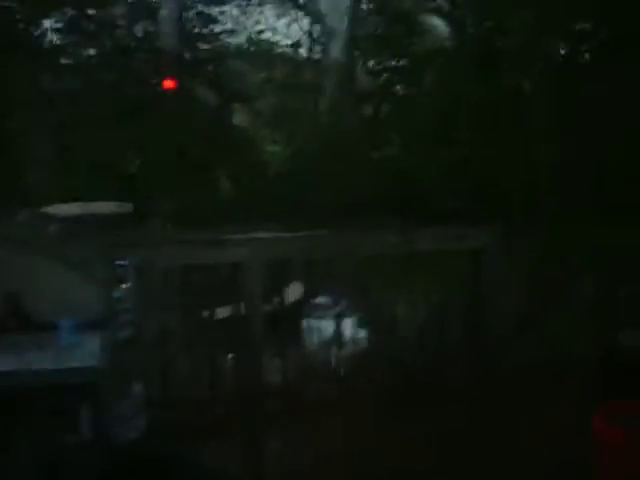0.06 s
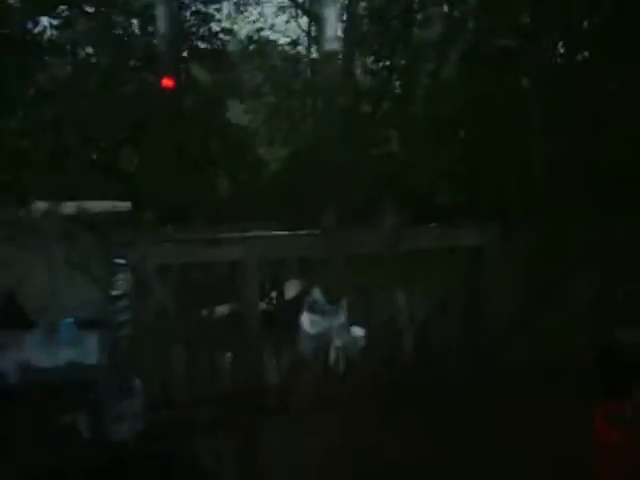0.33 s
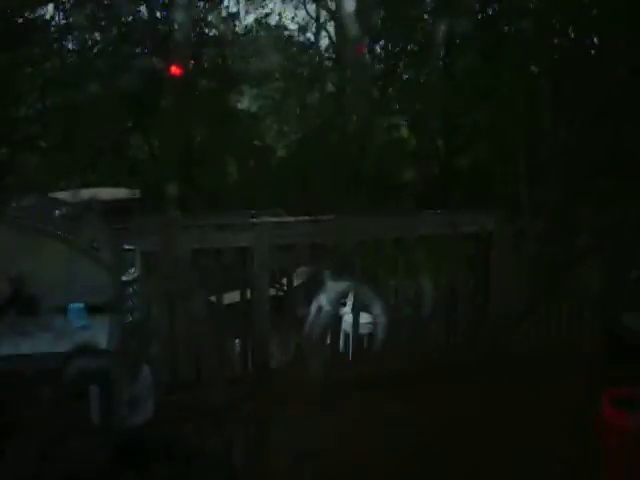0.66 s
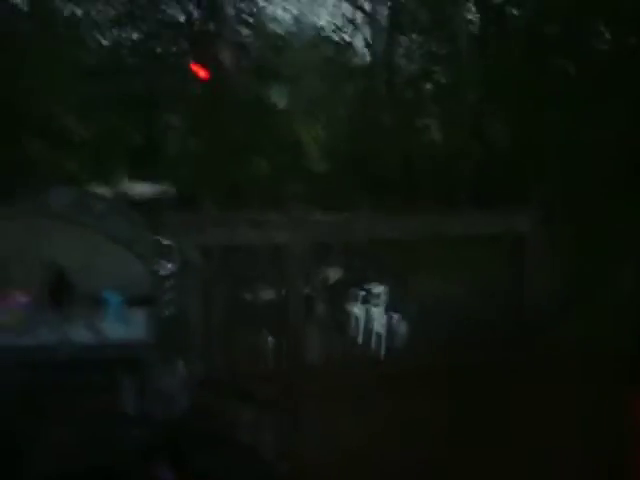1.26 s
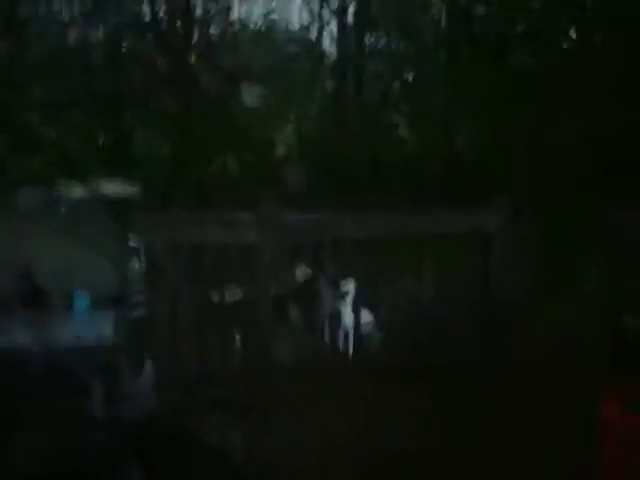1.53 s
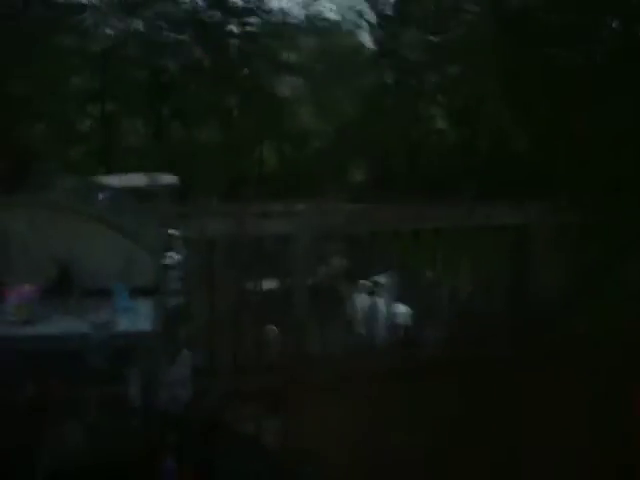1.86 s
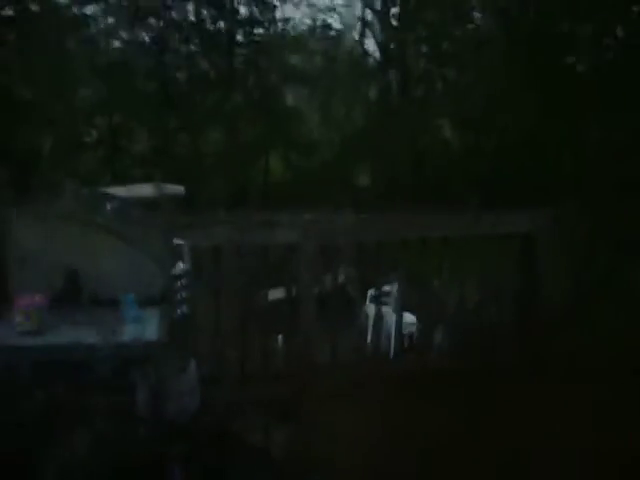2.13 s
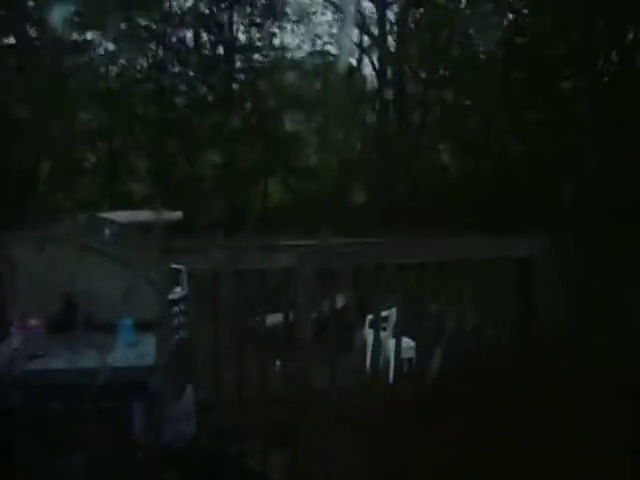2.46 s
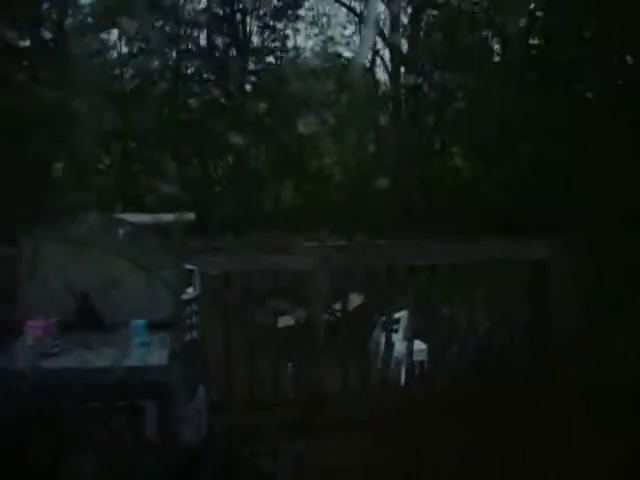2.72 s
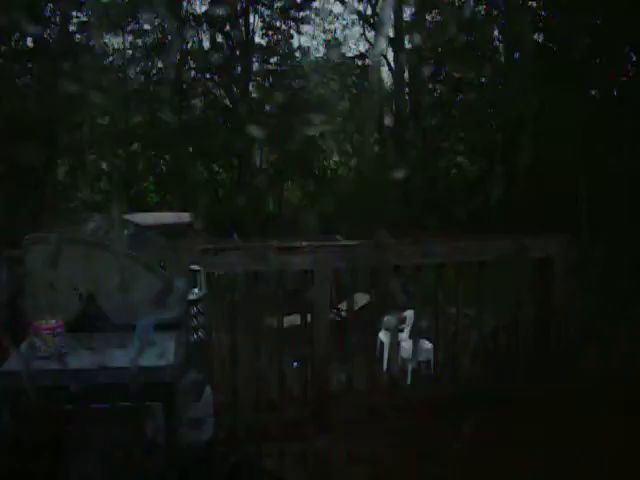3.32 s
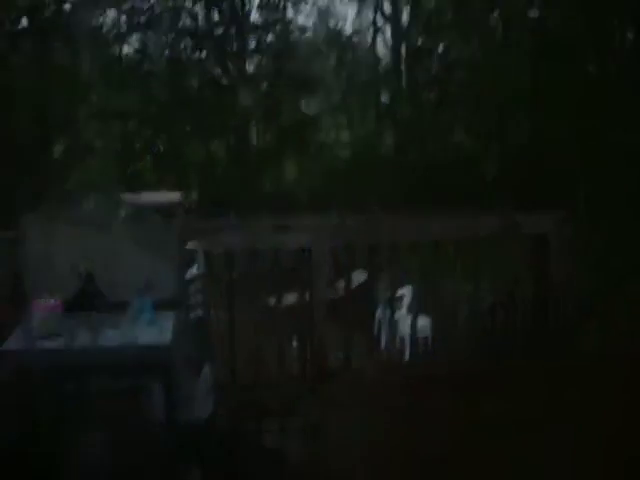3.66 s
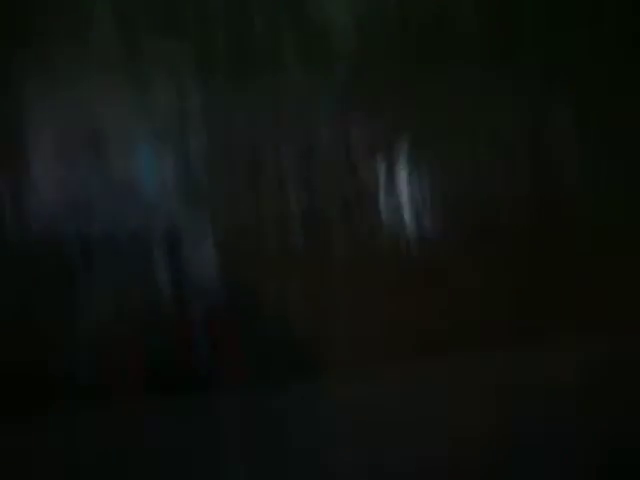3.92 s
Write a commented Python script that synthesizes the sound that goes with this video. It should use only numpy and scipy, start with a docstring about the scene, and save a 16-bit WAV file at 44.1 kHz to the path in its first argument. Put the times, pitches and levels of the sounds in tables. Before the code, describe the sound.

Hailstones cracking on a wooden deck in heavy rain, with low thunder rolling.

```python
"""Hailstones crack on a wooden deck in heavy rain, while low thunder rolls.
Each near stone is a sharp burst of noise, and now and then one rings a metal object.
Small hail patters on the boards, and far rain on the trees blends into a steady wash.
After many of the hard hits the whole background drops abruptly and swells back.
Close by there is one spatter of water and two dull knocks. A thin digital click sounds once."""
import sys
import numpy as np
from scipy import signal
from scipy.fft import rfft, irfft
from scipy.io import wavfile
from scipy.ndimage import uniform_filter1d

SR = 44100
rng = np.random.default_rng(int(sys.argv[2]) if len(sys.argv) > 2 else 0)


def wav_out(sig):
    """Save sig, one row per channel (or a flat mono array), as 16-bit PCM at SR to the path in sys.argv[1]."""
    wavfile.write(sys.argv[1], SR, np.round(np.clip(np.atleast_2d(sig).T, -1, 1) * 32767).astype(np.int16))


N = 176400  # 4 seconds
CUTOFF_HZ = 6400  # only the digital click reaches well above this


def hail():
    """Near hailstones hit the boards, loose objects and a metal plate."""
    # Each row: start in seconds, relative level in dB, strongest pitch in Hz, splash fade in seconds.
    stones = [(0.0185, -7.5, 4100, 0.002), (.1067, -17, 1340, 0.0059), (0.217, -19.5, 3500, .008),
              (0.2429, -8.5, 1330, 0.0042), (.290, -12, 4600, 0.0012), (.488, -13, 4440, 0.005),
              (.6145, -18, 2500, 0.0033), (.769, -17.5, 2480, 0.005), (.790, -13, 1800, 0.0068),
              (.883, -12, 3000, 0.0049), (0.9165, -6.5, 1720, 0.0032), (1.006, -31, 1500, .003),
              (1.209, -19, 3300, .003), (1.412, -11.5, 4400, 0.0056), (1.493, -23.5, 4300, 0.0016),
              (1.652, -11, 1880, 0.0037), (1.6732, -11.5, 2200, .005), (1.743, -10.5, 4800, 0.0065),
              (1.8549, -12.5, 5000, .007), (1.938, -12, 1490, 0.0088), (2.088, -16.5, 3750, 0.0046),
              (2.175, -13.5, 3270, 0.0033), (2.2091, -16, 2690, 0.0035), (2.2576, -21, 4000, 0.0055),
              (2.312, -9, 2210, 0.0015), (2.3952, -14, 3870, 0.0028), (2.4353, -19, 2480, 0.0052),
              (2.58, -25, 4500, 0.0027), (2.5994, -16.5, 3800, 0.0084), (2.679, -17.5, 3850, 0.0061),
              (2.805, -22.5, 3000, 0.0052), (2.918, -15, 2520, 0.0052), (3.0043, -9.5, 3570, 0.0039),
              (3.063, -10.5, 2260, 0.0036), (3.1722, -14, 2500, 0.0079), (3.2735, -16, 3900, .004),
              (3.392, -9, 1850, 0.0082), (3.505, -14.5, 2600, .005), (3.5824, -6.5, 2580, .002),
              (3.637, -11, 2500, 0.008), (3.647, -12.5, 4400, .003), (3.7029, -15.5, 2800, .005),
              (3.758, -20, 3800, .005), (3.7858, -12, 2000, .004), (3.801, -12.5, 2980, .004),
              (3.8617, -21, 2200, .004), (3.9523, -13.5, 2400, .005)]
    # Loose objects. Each row: start in seconds, pitch in Hz, level in dB, seconds to fade by 60 dB.
    pings = [(.163, 1815, -25.5, 0.22), (1.549, 1298, -20.5, 0.26), (1.575, 1304, -24.5, .2),
             (1.602, 1326, -19.5, 0.11), (1.74, 1365, -14.5, 0.063), (2.775, 2090, -33.5, .22),
             (2.85, 2375, -26.5, 0.16), (3.064, 1240, -23, 0.13), (3.727, 1340, -19.5, 0.11),
             (3.76, 947, -22, 0.21)]
    # The plate's tones. Each row: pitch in Hz, level in dB, seconds to fade by 60 dB.
    plate_tones = [(2400, -26, 0.23), (2786, -26, 0.16), (3149, -49, .1), (3850, -40, 0.13),
                   (4269, -35, 0.12), (4932, -29.5, .08)]
    out = np.zeros(N)
    for start, *row in stones:
        add(out, start, stone(*row))
    for start, *row in pings:
        add(out, start, ring(*row))
    add(out, start_s=2.6005, sound=sum(ring(*tone) for tone in plate_tones))
    return out


def stone(db, hz, splash_s, crack_s=0.001):
    """One stone makes a sharp crack and a splash of fragments, coloured by the spot it hits."""
    t, f = np.arange(SR // 10) / SR, np.fft.rfftfreq(SR // 10, 1 / SR)
    burst = rng.standard_normal(len(t)) * (np.exp(-t / crack_s) + amp(3.5) * np.exp(-t / splash_s))
    octaves = np.log2((f + 1) / hz)
    peak = amp(-4.5) + np.exp(-.5 * (octaves / 0.39) ** 2)
    tilt = amp(-1.5 * octaves)
    bass_cut = f ** 2 / (f ** 2 + 480 ** 2)
    colour = peak * tilt * bass_cut / (1 + (f / CUTOFF_HZ) ** 10) + 1e-4
    # This kind of filter (minimum phase) keeps the start of the crack sharp.
    log_gain = np.log(np.r_[colour, colour[-2:0:-1]])
    response = np.exp(signal.hilbert(log_gain).conj())[:len(f)]
    hit = irfft(rfft(burst) * response)
    return amp(db - 7.5) * hit / hit[:SR // 250].std()  # the first 4 ms set the level


def ring(hz, db, fade_s):
    """A struck object vibrates with a pure tone that dies away."""
    t = np.arange(SR // 3) / SR
    return amp(db - 60 * t / fade_s) * np.sin(2 * np.pi * hz * t)


def deck(x, echoes_per_s=2000, fade_s=0.062):
    """Adds short, scattered echoes from the boards, railing and wall."""
    t = np.arange(SR // 4) / SR
    echoes = rng.standard_normal(len(t)) * (rng.random(len(t)) < echoes_per_s / SR)
    echoes *= (t > .003) * amp(-60 * t / fade_s)
    return x + amp(-9) * signal.fftconvolve(x, echoes / np.linalg.norm(echoes))[:N]


def patter(spots=40, hits_per_s=800, spread_db=4, fade_cycles=4.4):
    """Small hail and big drops land at random: each clicks and briefly rings a spot on the deck."""
    # Each row: frequency in Hz, relative level in dB.
    spectrum = [(500, -4), (1100, 7.5), (1600, -3), (2500, 2), (4000, -7), (6000, -3)]
    t, out = np.arange(SR // 40) / SR, np.zeros(N)
    size = amp(spread_db * np.minimum(rng.exponential(1, N), 4.5))
    hits = size * (rng.random(N) < hits_per_s / SR)
    spot = rng.integers(0, spots, N)
    for k, hz in enumerate(np.geomspace(700, 5600, spots)):
        tone = unit(np.sin(2 * np.pi * hz * t) * np.exp(-t * hz / fade_cycles))
        click = unit(rng.standard_normal(len(t)) * np.exp(-t / .0015))
        out += signal.oaconvolve(hits * (spot == k), tone + 1.97 * click)[:N]
    band = signal.butter(4, [400, 6000], "band", fs=SR, output="sos")
    return amp(-28) * unit(signal.sosfilt(band, coloured(out, spectrum)))


def rain():
    """Countless far drops on the trees and the yard merge into a wash."""
    # Each row: frequency in Hz, relative level in dB.
    spectrum = [(40, -5), (200, -3), (600, -7.5), (950, -5), (1300, 0), (1550, -6), (2500, -3.5),
                (3200, -7), (3900, -5), (5000, -14), (7000, -21.5)]
    return amp(-27.5) * patchy(noise(spectrum), patch_db=2.5, flicker_db=1.5)


def thunder():
    """A deep, lumpy rumble rolls on, with a higher roar swelling above it."""
    # How loud each part is. Each row: time in seconds, level in dB.
    rumble_levels = [(0, -29), (.1, -21), (.17, -25.5), (.27, -20.5), (.35, -23.5), (.53, -24.5), (.6, -21),
                     (.68, -25), (.93, -9), (1.2, -12), (1.4, -18), (1.52, -13.5), (1.63, -22.5),
                     (1.7, -24), (1.83, -14.5), (1.88, -21.5), (1.96, -11), (2.02, -21.5), (2.27, -19),
                     (2.42, -24.5), (2.56, -14.5), (2.62, -30.5), (2.71, -16), (2.82, -13.5), (3.05, -20),
                     (3.4, -24.5), (3.56, -18.5), (3.7, -22.5), (4, -20)]
    roar_levels = [(0, -26), (.25, -18), (.34, -25), (.7, -24), (.9, -17.5), (1.15, -17.5), (1.4, -22.5),
                   (1.7, -22), (1.88, -22.5), (1.96, -17.5), (1.99, -26.5), (2.3, -22.5), (2.35, -33),
                   (2.56, -23.5), (2.62, -35), (2.85, -25), (3.5, -22.5), (4, -25)]
    # The colour of each part. Each row: frequency in Hz, relative level in dB.
    rumble_spectrum = [(15, -17.5), (32, -12), (50, -2.5), (75, -1.5), (105, -3), (135, 1), (165, -0.5),
                       (205, -2.5), (255, -9.5), (290, -5), (400, -15), (800, -27), (2000, -66)]
    roar_spectrum = [(100, -17), (230, -6), (320, -3.5), (500, -1), (650, -2), (800, -6), (1100, -9),
                     (1600, -11), (2500, -26.5), (6000, -43)]
    rumble = level(rumble_levels) * noise(rumble_spectrum)
    roar = level(roar_levels) * patchy(noise(roar_spectrum), patch_db=1.45, flicker_db=0.46)
    return rumble + roar


def close_water(spatter_s=.068):
    """Water spatters right beside the microphone, and dull knocks land on it."""
    # The spatter's colour. Each row: frequency in Hz, relative level in dB.
    spectrum = [(200, -31), (900, 3.5), (2000, -3.5), (5000, -5), (7000, -6)]
    # Each row: start in seconds, level in dB, fade time in seconds.
    knocks = [(0.289, -22, .05), (1.411, -16, 0.018)]
    out, t = np.zeros(N), np.arange(SR // 2) / SR
    spray = patchy(noise(spectrum), patch_db=1.5, flicker_db=3)
    add(out, start_s=1.348, sound=amp(-17.5) * spray[:round(spatter_s * SR)])
    for start, db, fade_s in knocks:
        add(out, start, amp(db) * (1 - np.exp(-t / 0.0012)) * np.exp(-t / fade_s))
    return out


def digital_click():
    """A one-sample glitch makes a thin click, brighter than everything else."""
    out = np.zeros(N)
    add(out, start_s=3.3638, sound=amp([-10.5]))
    return signal.sosfilt(signal.butter(1, (3800, 9600), "band", fs=SR, output="sos"), out)


def dips(fall_s=0.003, recover_db_per_s=22):
    """The background's volume drops abruptly at the listed times and climbs back steadily."""
    # Each row: start in seconds, depth in dB.
    drops = [(0.016, 3.5), (0.117, 7.5), (0.292, 13), (.922, 3), (1.417, 7.5), (1.657, 9), (1.747, 7.5),
             (1.859, 8.5), (1.975, 15.5), (2.314, 15), (2.584, 14.5), (3.008, 7.5), (3.587, 4),
             (3.791, 5.5)]
    t = np.arange(N) / SR
    each_db = [(t >= start) * np.maximum(depth - recover_db_per_s * (t - start), 0)
               for start, depth in drops]
    return amp(-uniform_filter1d(np.max(each_db, axis=0), round(fall_s * SR)))


def amp(db):
    """Turns decibels into a number to multiply by."""
    return 10 ** (np.asarray(db) / 20)


def unit(x):
    """Scales a signal to an average strength (rms) of 1."""
    return x / np.sqrt(np.mean(x ** 2) + 1e-20)


def level(points):
    """Joins points of time and dB into a volume for every sample."""
    return amp(np.interp(np.arange(N) / SR, *np.transpose(points)))


def add(mix, start_s, sound):
    """Mixes a sound in at the given time."""
    part = mix[max(round(start_s * SR), 0):][:len(sound)]
    part += sound[:len(part)]


def coloured(x, spectrum):
    """Turns each frequency up or down, following points of Hz and dB."""
    hz, db = np.transpose(spectrum)
    f = np.fft.rfftfreq(len(x), 1 / SR)
    gain = amp(np.interp(np.log(f + 1), np.log(hz), db))
    return irfft(rfft(x) * gain, len(x))


def noise(spectrum):
    """Noise of strength 1 with the given colour."""
    return unit(coloured(rng.standard_normal(N), spectrum))


def patchy(x, patch_db, flicker_db):
    """Makes noise uneven: drifting patches, and a quick flicker that all frequencies share."""
    bands = signal.stft(x, nperseg=512, noverlap=384)[2]
    patches = uniform_filter1d(rng.standard_normal(bands.shape), size=5, axis=0)  # smooth over pitch
    patches = unit(uniform_filter1d(patches, size=10, axis=1))  # smooth over time
    flicker = unit(uniform_filter1d(rng.standard_normal(bands.shape[1]), size=4))
    gain = amp(patch_db * patches + flicker_db * flicker)
    return unit(signal.istft(bands * gain, nperseg=512, noverlap=384)[1][:N])


def low_pass(x, hz):
    """Steeply cuts everything above the given frequency."""
    return signal.oaconvolve(x, signal.firwin(1023, hz, window=("kaiser", 9), fs=SR), "same")


def scene():
    """Near hail stands out in front of thunder, rain and patter."""
    background = thunder() + rain() + deck(patter())
    return (deck(hail()) + dips() * background + close_water())[None]


def record(dry):
    """A small microphone dulls the treble; the digital click is added afterwards and stays bright."""
    # Each row: frequency in Hz, change in level in dB.
    mic_treble = [(4900, -2.5), (5300, -4), (5600, -9), (5900, -17.5), (6150, -28.5), (6400, -56)]
    padded = np.pad(dry[0], (0, SR // 10))
    dull = low_pass(coloured(padded, mic_treble)[:N], CUTOFF_HZ)
    return low_pass(dull + digital_click(), hz=16000)[None]


dry = scene()
out = record(dry)
wav_out(out)
```